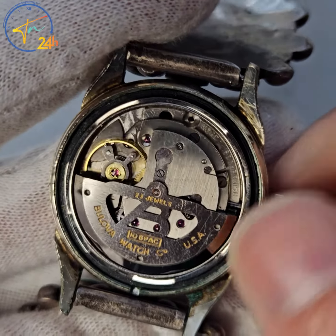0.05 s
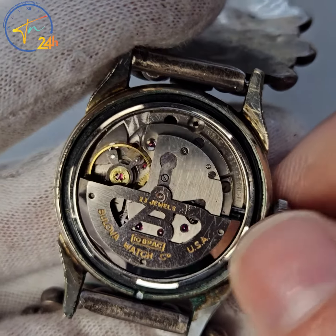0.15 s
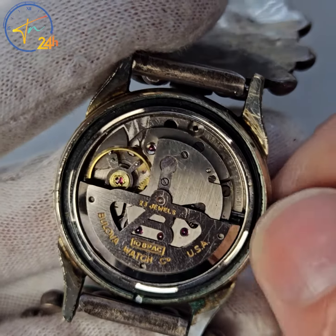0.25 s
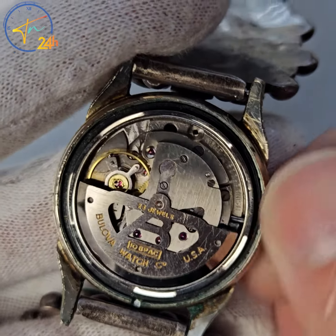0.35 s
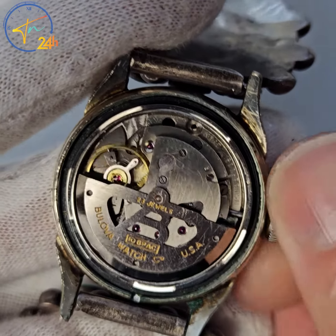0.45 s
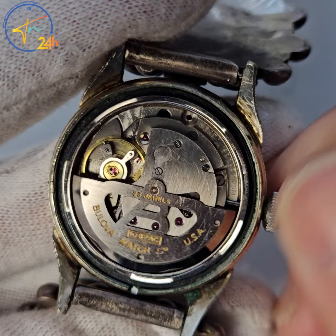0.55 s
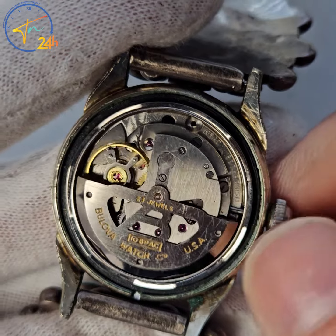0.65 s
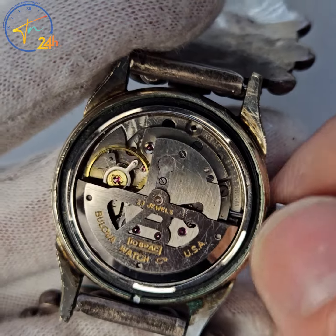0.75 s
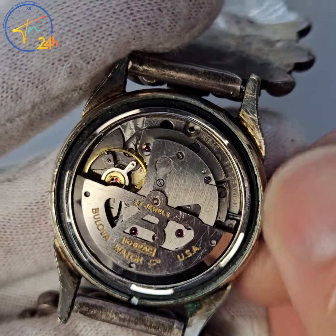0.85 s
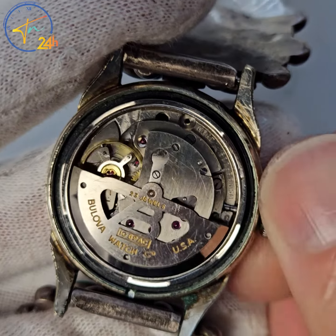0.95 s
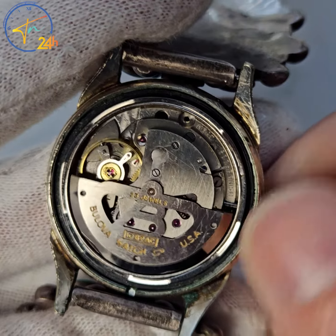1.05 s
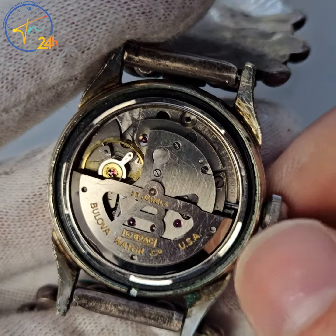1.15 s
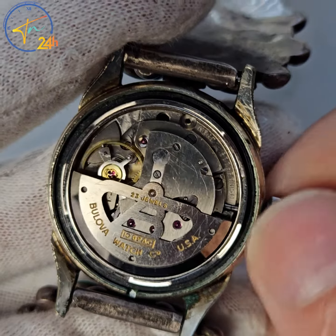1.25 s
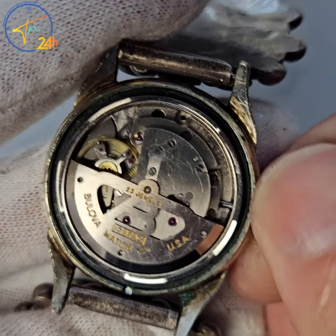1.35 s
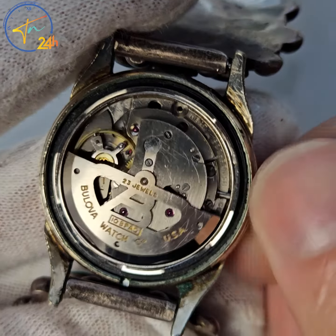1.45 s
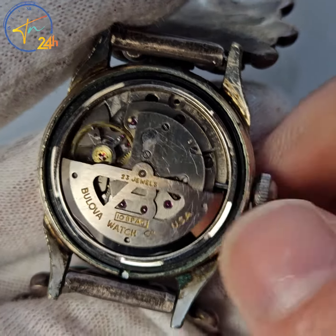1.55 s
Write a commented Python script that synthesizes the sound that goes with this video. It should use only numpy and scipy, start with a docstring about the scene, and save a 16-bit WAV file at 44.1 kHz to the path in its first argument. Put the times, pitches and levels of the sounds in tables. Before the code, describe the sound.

Three short ratcheting zips of a small watch being wound by hand, with tiny ticks, very close

```python
"""A wristwatch wound close to a stereo microphone in a quiet room, 1.6 s, over low rumble, wavering hum and hiss.
First, near 0.1 s, fingertips brush the crown and it knocks; knocks, ticks and brushes recur between the turns.
From about 0.22, 0.73 and 1.2 s come three quick turns: gear teeth whirr up and down in pitch with the
speed over a dry rasp, coloured by the steel case. Last, near 1.45 s, a soft brush and a tick.
The knocks are decaying sines with a noise snap; the brushes are filtered grains; a faint room tail follows."""
import sys
import numpy as np
from scipy import signal
from scipy.fft import rfft, irfft, next_fast_len
from scipy.io import wavfile
from scipy.ndimage import map_coordinates

SR = 44100
rng = np.random.default_rng(int(sys.argv[2]) if len(sys.argv) > 2 else 0)


def dump(signal):
    """Clip the signal to [-1, 1] and save it as 16-bit WAV at the path in sys.argv[1]."""
    limited = np.clip(np.atleast_2d(signal).T, -1, 1)
    pcm = np.round(limited * 32767).astype(np.int16)
    wavfile.write(sys.argv[1], SR, pcm)


N = 70560  # samples, 1.6 s

# Low rumble of the background: pitch_hz, relative level_db
RUMBLE_SPECTRUM = [(20, -53), (40, -14), (70, 0), (100, 1), (140, 2), (220, -2), (340, -4.5), (450, -20),
                   (650, -35), (1000, -63.5), (2000, -65)]
# Left-right likeness of the rumble: pitch_hz, likeness (1 = same on both sides)
RUMBLE_LIKENESS = [(40, 0.27), (120, 0.85), (350, 0.74), (700, 0.9)]
# Slow swell of the rumble: time_s, level_db before the rumble trim
RUMBLE_SWELL = [(0, -57.5), (0.35, -55), (0.68, -57.5), (0.82, -54.5), (1.02, -58.5), (1.3, -56),
                (1.58, -61)]
RUMBLE_TRIM_DB, BACKGROUND_PAN_DB = -2, -3.5  # the pan is left over right, for rumble and hum
# Wavering hum: time_s, level_db before panning
HUM_LEVEL = [(0, -53), (0.084, -54), (0.13, -74), (0.182, -57.5), (0.23, -61), (0.27, -55), (0.45, -59.5),
             (0.56, -65.5), (0.61, -52.5), (0.67, -85), (0.81, -55), (1.096, -72), (1.18, -53.5),
             (1.22, -82.5), (1.27, -51), (1.32, -68), (1.38, -48.5), (1.466, -73)]
HUM_HZ, HUM_DRIFT_HZ, HUM_DRIFT_PER_S = 124, 7.5, 12
# Faint hiss: pitch_hz, relative level_db
HISS_SPECTRUM = [(100, -6.5), (700, -6.5), (1500, -9.5), (4000, -10), (8000, -17.5), (16000, -24)]
HISS_DB = -80  # rms

# Decay of the room tail: pitch_hz, t60_s
ROOM_DECAY = [(200, 0.24), (2000, 0.55), (5000, 0.41), (10000, 0.44), (15000, 0.42)]
ROOM_DB = -20
# Phase between the two microphone ports: pitch_hz, left_lead_rad
PORT_LEAD = [(400, 0), (1800, 1.8), (2350, 2.0), (2700, 3.1), (3750, 3.3), (4400, 6.1), (4900, 5.4),
             (5450, 6.8), (6100, 6.3), (7400, 8.0), (8400, 6.2), (10200, 9.9), (11500, 10.1), (12400, 12.0),
             (15000, 13.0)]

# Broad response of the watch case: pitch_hz, left level_db, right level_db
CASE_RESPONSE = [(500, -89, -55), (1080, -43, -45.5), (1570, -26.5, -37.5), (1910, -18.5, -25.5),
                 (2090, -2.5, -6), (2920, -10, -9.5), (3250, 5, 2), (3490, -12.5, -18.5), (4010, -4.5, 0.5),
                 (4690, -4.5, -11.5), (5120, -0.5, -2), (6110, -0.5, -11.5), (6780, -24.5, -32),
                 (7260, -6, -33), (7870, -10.5, -11.5), (10500, -5, -8), (11800, -5.5, -9.5),
                 (11600, -1.5, -2.5), (16300, -7.5, -10)]
# Narrow ringing of the steel: pitch_hz, width_hz, level_db over the broad response
STEEL_RESONANCES = [(4315, 30, 6.5), (4900, 17, -35), (4840, 30, -11), (12700, 70, 2), (14200, 150, -6),
                    (14335, 87, 5.5), (14500, 60, 8)]
# Left-right likeness of the friction grains: pitch_hz, likeness
GRIT_LIKENESS = [(1000, 0.19), (2200, 0.75), (2700, 1), (3700, 0.6), (5200, 0.52), (6800, .3), (8500, 0.58),
                 (15000, 0.34)]
GRAINS_PER_S, GRAIN_SPREAD_DB = 11000, 2.5

# Fingertips brushing the crown: middle_s, half_length_s, peak level_db
SCUFFS = [(0.082, .012, -67), (0.19, .018, -61.5), (0.47, .028, -59.5), (0.698, .016, -66.5),
          (0.936, .02, -72), (1.192, .012, -62.5), (1.45, .04, -67)]

# Knocks and ticks of the crown: start_s, knock level_db, knock pitch_hz, ring level_db, ring pitch_hz,
# snap level_db, left-over-right pan_db (levels before the click gain)
CLICKS = [(0.0797, -46.5, 2240, -75, 4600, -57, 3), (0.1824, -49, 2310, -52.5, 4680, -58, 5.5),
          (0.2160, -52, 2330, -52, 5050, -53, 1), (0.4390, -51.5, 2430, -61, 4600, -72, 5),
          (0.447, -54, 2860, -54, 4170, -48, 3), (0.4650, -57, 1610, -53, 4250, -77, 6.5),
          (0.4740, -56, 1580, -59.5, 4450, -77, 6), (0.488, -59.5, 3190, -76, 4900, -51.5, 4),
          (0.5919, -72, 1650, -81, 4400, -84, 7.5), (0.6550, -76, 3000, -73.5, 5360, -93, 12.5),
          (0.6989, -42, 2430, -52.5, 4100, -53.5, 4), (0.7232, -66, 2700, -60.5, 4230, -60, 5),
          (0.7312, -65, 2400, -56, 4240, -43, 3), (0.8870, -52.5, 2970, -56.5, 4670, -62, 2.5),
          (0.9373, -92.5, 2380, -62.5, 4600, -55.5, 5), (0.966, -60.5, 2440, -71, 3930, -67, 3.5),
          (1.0819, -47, 2244, -68, 4180, -60.5, 2.5), (1.19, -75, 2500, -73.5, 4550, -65, 32.5),
          (1.1963, -36, 2296, -46.5, 4340, -43, 3), (1.2036, -46.5, 2290, -51, 4760, -54, 10.5),
          (1.419, -74, 3060, -54, 5130, -44, 4.5), (1.4659, -70, 3000, -53.5, 5040, -45, 4)]
# Modes of the knock: ratio to its pitch, relative level_db, t60_s
KNOCK_MODES = [(.92, -16.5, 0.03), (1, 8.5, 0.017), (1.28, 15, 0.0076)]
# Modes of the ring: ratio to its pitch, relative level_db, t60_s
RING_MODES = [(.87, 2.5, 0.003), (1, -12, .016), (1.16, -1, 0.002)]
# Colour of the bright snap: pitch_hz, relative level_db
SNAP_SPECTRUM = [(1000, -40), (3000, -6.5), (6500, 0), (8500, 0), (12500, 5.5), (16000, 9.5)]
CLICK_RISE_S, SNAP_T60_S, CLICK_GAIN_DB = 0.00074, 0.017, 23.5
CLICK_LOWEST_HZ = 1528  # the small case radiates little below this

# Gear speed, one list per turn: time_s, tooth rate_hz before its random unevenness
GEAR_SPEEDS = [
    [(0.216, 650), (0.25, 1280), (0.275, 1500), (0.303, 1950), (0.32, 2400), (0.338, 2600), (0.355, 2020),
     (0.374, 1150), (0.395, 450)],
    [(0.731, 700), (0.755, 1150), (0.775, 1900), (0.79, 2300), (0.803, 2750), (0.822, 2580), (0.839, 1900),
     (0.852, 1200), (0.89, 450)],
    [(1.217, 950), (1.235, 1400), (1.252, 1750), (1.266, 2400), (1.279, 2720), (1.295, 2420), (1.31, 1950),
     (1.325, 1400), (1.37, 450)],
]
# Force of the fingers, one list per turn: time_s, level_db before the winding gain
FINGER_FORCES = [
    [(0.2145, -52), (0.216, -51), (0.24, -50), (0.29, -41), (0.314, -41.5), (0.342, -38), (0.375, -42.5),
     (0.392, -50.5), (0.402, -83)],
    [(0.729, -66), (0.732, -50.5), (0.774, -41.5), (0.808, -40.5), (0.826, -39.5), (0.852, -44),
     (0.878, -49), (0.896, -68)],
    [(1.205, -70.5), (1.222, -45), (1.25, -43), (1.279, -38), (1.306, -40), (1.329, -47.5), (1.366, -56),
     (1.378, -88)],
]
# Whirr of the meshing teeth: multiple of the tooth rate, relative level_db
MESH_PARTIALS = [(1, -4.5), (2, -3), (3, -8), (4, -31.5), (5, -8.5)]
SPEED_UNEVEN, SPEED_UNEVEN_PER_S = 0.0218, 170  # fraction of the tooth rate, knots a second
MESH_JITTER, MESH_JITTER_PER_S = 0.02017, 1500  # fraction of the tooth rate, knots a second
MESH_FLUTTER_DB, MESH_FLUTTER_PER_S = 2, 300
JUDDER_DB, JUDDER_PER_S = 0.46, 340
WHIRR_FULL_HZ = 2300  # the teeth sing out only as the gears speed up to this rate
RASP_DB, WINDING_GAIN_DB = 3, 8

TOP_HZ = 15900  # band limit of the recorder


def amp(db):
    """Decibels to gain."""
    return 10 ** (np.asarray(db) / 20)


def unit(x):
    """Scaled to rms 1."""
    return x / np.sqrt(np.mean(x ** 2) + 1e-20)


def along(points, hz):
    """(pitch_hz, value) points read on a log frequency axis."""
    f, v = np.transpose(points)
    return np.interp(np.log(hz + 1), np.log(f + 1), v)


def curve(rows, outside=None):
    """(time_s, value) rows as one value per sample."""
    s, v = np.transpose(rows)
    return np.interp(np.arange(N) / SR, s, v, outside, outside)


def wobble(rate):
    """A smooth random curve through rate knots a second."""
    knots = rng.standard_normal(N // 4)
    return map_coordinates(knots, [np.arange(N) * rate / SR], mode="mirror")


def pan(db):
    """Left and right gains for a level difference, left over right."""
    return amp(np.array([[db], [-db]]) / 2)


def filtered(x, response):
    """x through a complex response of frequency."""
    n = x.shape[-1]
    m = next_fast_len(2 * n)
    return irfft(rfft(x, m) * response(np.fft.rfftfreq(m, 1 / SR)), m)[..., :n]


def paired(two, likeness):
    """Two unrelated signals blended as mid and side into left and right of a given likeness."""
    def mid_side_gains(hz):
        angle = np.arccos(np.clip(along(likeness, hz), -1, 1)) / 2
        return np.array([np.cos(angle), np.sin(angle)])

    mid, side = filtered(two, mid_side_gains)
    return np.array([mid + side, mid - side])


def noise(spectrum, size):
    """Two unrelated coloured noises, together rms 1."""
    white = rng.standard_normal((2, size))
    return unit(filtered(white, lambda hz: amp(along(spectrum, hz))))


def rumble():
    """Low noise, partly shared by both sides, that swells slowly."""
    level = amp(RUMBLE_TRIM_DB + curve(RUMBLE_SWELL))
    return level * unit(paired(noise(RUMBLE_SPECTRUM, size=N), RUMBLE_LIKENESS))


def hum():
    """A low sine wavering in pitch and level."""
    pitch_hz = HUM_HZ + HUM_DRIFT_HZ * wobble(HUM_DRIFT_PER_S)
    tone = np.sin(2 * np.pi * np.cumsum(pitch_hz) / SR)
    return amp(curve(HUM_LEVEL)) * unit(tone)


def background():
    """Rumble and hum leaning to one side, with faint wide hiss."""
    hiss = amp(HISS_DB) * noise(HISS_SPECTRUM, size=N)
    return pan(BACKGROUND_PAN_DB) * (rumble() + hum()) + hiss


def room(x):
    """A faint noise tail in which each frequency dies at its own speed."""
    hz, t, grid = signal.stft(rng.standard_normal((2, SR // 2)), SR, nperseg=256)
    decay = amp(-60 * t / along(ROOM_DECAY, hz)[:, None])
    tail = signal.istft(grid * decay, SR, nperseg=256)[1]
    tail = tail / np.linalg.norm(tail[0])
    return amp(ROOM_DB) * signal.fftconvolve(x, tail, axes=1)[:, :N]


def ports(x):
    """The watch reaches the two microphone ports out of phase, by an angle that varies with pitch."""
    half_each = .5j * np.array([[1], [-1]])
    return filtered(x, lambda hz: np.exp(half_each * along(PORT_LEAD, hz)))


def case(hz):
    """Left and right response of the watch case: a broad curve times narrow steel resonances."""
    f, left, right = np.transpose(CASE_RESPONSE)
    broad = amp([along(np.c_[f, side], hz) for side in (left, right)])
    ringing = sum(amp(db) * 1j * hz * width / (centre * centre - hz * hz + 1j * hz * width)
                  for centre, width, db in STEEL_RESONANCES)
    return broad * (1 + ringing)


def grit():
    """Dense random grains of dry friction, rms 1."""
    happens = rng.random(N) < GRAINS_PER_S / SR
    size = amp(GRAIN_SPREAD_DB * rng.standard_normal(N))
    grains = happens * size * rng.standard_normal((2, N))
    return unit(paired(grains, GRIT_LIKENESS))


def scuffs(patchy_db=4, patches_per_s=270, dull_hz=7000):
    """Skin brushes the knurled crown in soft, uneven patches, dulled and coloured by the case."""
    t = np.arange(N) / SR
    touch = sum(amp(db) * np.exp(-((t - middle) / half) ** 2) for middle, half, db in SCUFFS)
    patchy = grit() * amp(patchy_db * wobble(patches_per_s))
    return touch * unit(filtered(patchy, lambda hz: case(hz) / (1 + 1j * hz / dull_hz)))


def clicks():
    """Each contact knocks the crown, rings the case and gives a short bright snap."""
    t = np.arange(SR // 20) / SR
    rise = 1 - np.exp(-(t / CLICK_RISE_S) ** 2)
    out = np.zeros((2, N + SR))

    def struck(modes, hz):
        return rise * sum(amp(db - 60 * t / t60) * np.sin(2 * np.pi * hz * ratio * t)
                          for ratio, db, t60 in modes)

    for start, knock_db, knock_hz, ring_db, ring_hz, snap_db, pan_db in CLICKS:
        knock = struck(KNOCK_MODES, knock_hz)
        ring = struck(RING_MODES, ring_hz)
        snap = rise * amp(-60 * t / SNAP_T60_S) * noise(SNAP_SPECTRUM, size=len(t))
        parts = [(knock_db, knock), (ring_db, ring), (snap_db, snap)]
        # each part is brought to unit energy before its level
        hit = sum(amp(db + CLICK_GAIN_DB) * x / np.linalg.norm(x, axis=-1, keepdims=True)
                  for db, x in parts)
        first = round(start * SR)
        out[:, first:first + len(t)] += pan(pan_db) * hit
    highpass = signal.butter(N=3, Wn=CLICK_LOWEST_HZ, btype="high", fs=SR, output="sos")
    return signal.sosfilt(highpass, out[:, :N])


def force():
    """The pull of the fingers through all three turns, as a gain."""
    return sum(amp(curve(turn, outside=-200)) for turn in FINGER_FORCES)


def whirr(rate):
    """Meshing teeth: harmonics of the tooth rate, each fluttering, louder as the gears speed up."""
    teeth = np.cumsum(rate * (1 + MESH_JITTER * wobble(MESH_JITTER_PER_S))) / SR
    tone = sum(amp(db + MESH_FLUTTER_DB * wobble(MESH_FLUTTER_PER_S)) * np.sin(2 * np.pi * k * teeth)
               for k, db in MESH_PARTIALS)
    return tone * np.minimum(rate / WHIRR_FULL_HZ, 1) ** 1.3


def winding():
    """Meshing teeth and rasping grains, juddering slightly, driven by the fingers through the case."""
    rate = curve([row for turn in GEAR_SPEEDS for row in turn])
    rate = rate * (1 + SPEED_UNEVEN * wobble(SPEED_UNEVEN_PER_S))
    judder = amp(JUDDER_DB * wobble(JUDDER_PER_S))
    drive = (whirr(rate) + amp(RASP_DB) * grit()) * judder
    return amp(WINDING_GAIN_DB) * filtered(force() * drive, case)


def scene():
    """The watch close to the microphone in a quiet room."""
    watch = ports(scuffs() + clicks() + winding())
    return background() + room(watch) + watch


def record(dry):
    """The recorder cuts steeply above its band limit."""
    return filtered(dry, lambda hz: 1 / (1 + (hz / TOP_HZ) ** 200))


dry = scene()
out = record(dry)
dump(out)
```